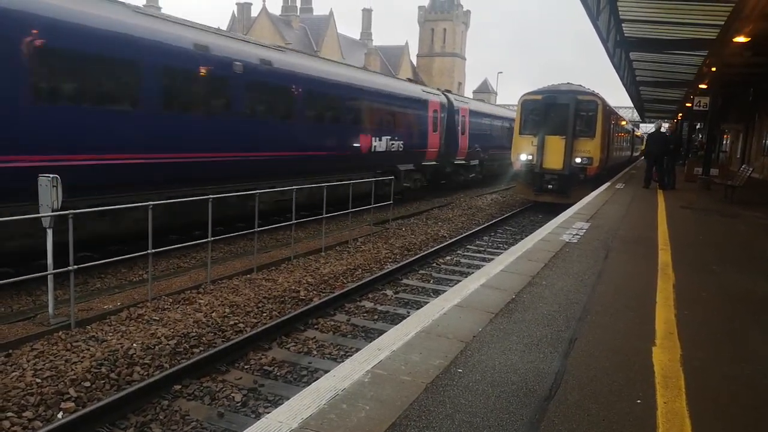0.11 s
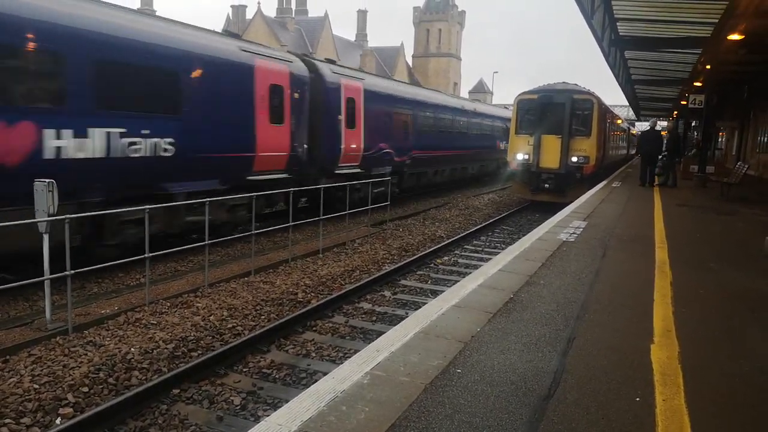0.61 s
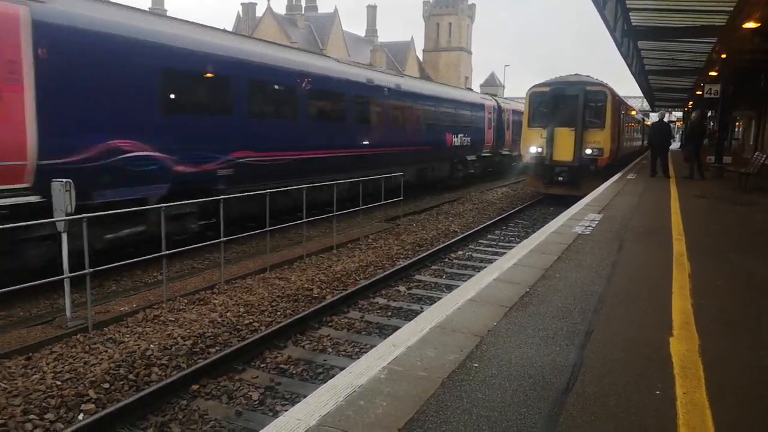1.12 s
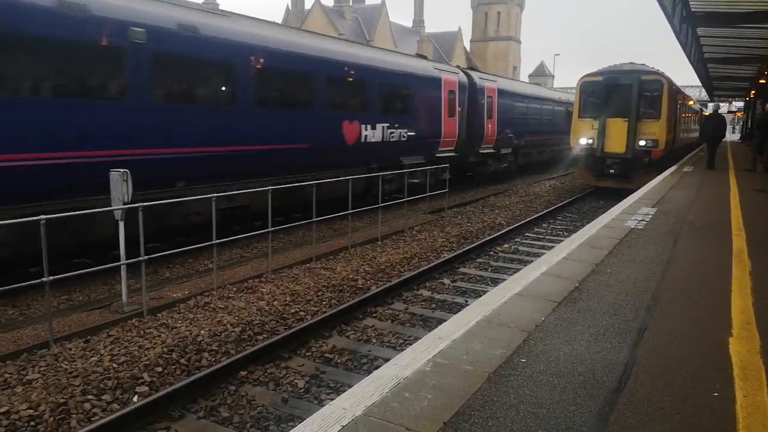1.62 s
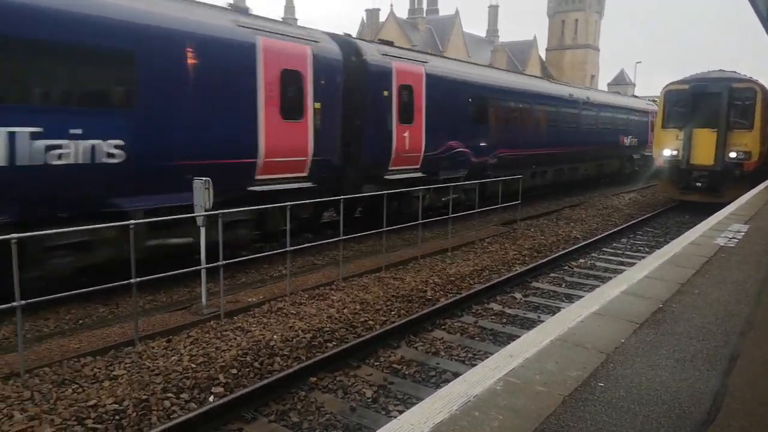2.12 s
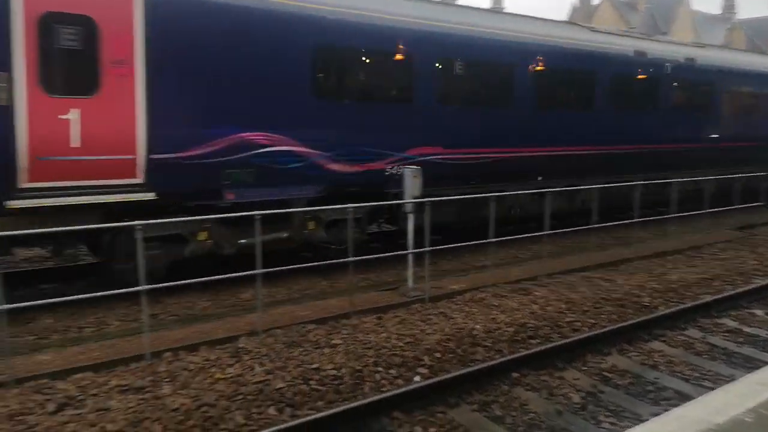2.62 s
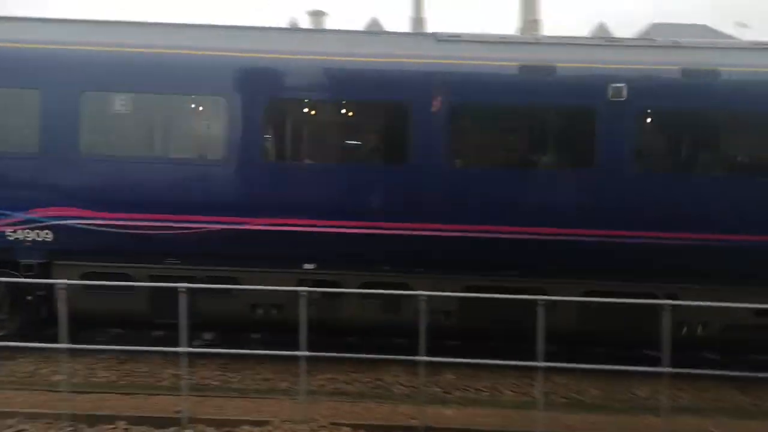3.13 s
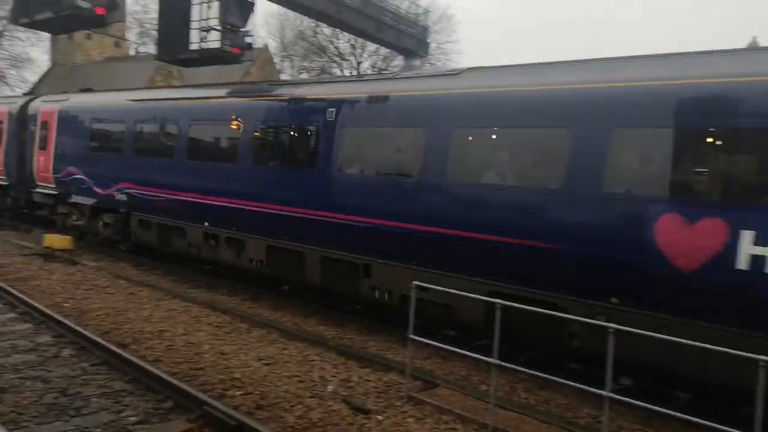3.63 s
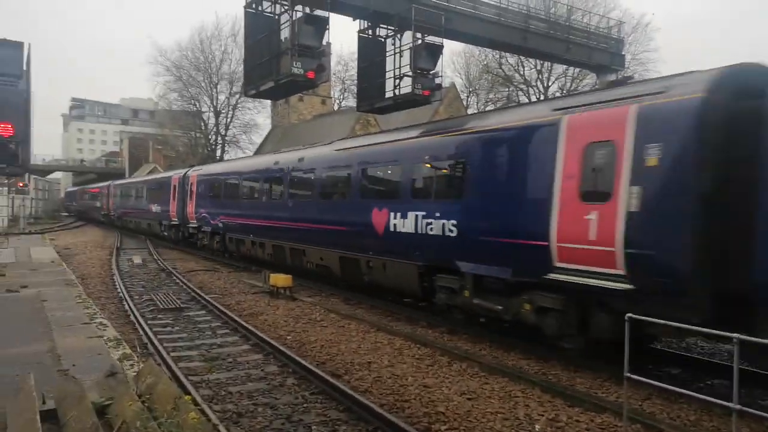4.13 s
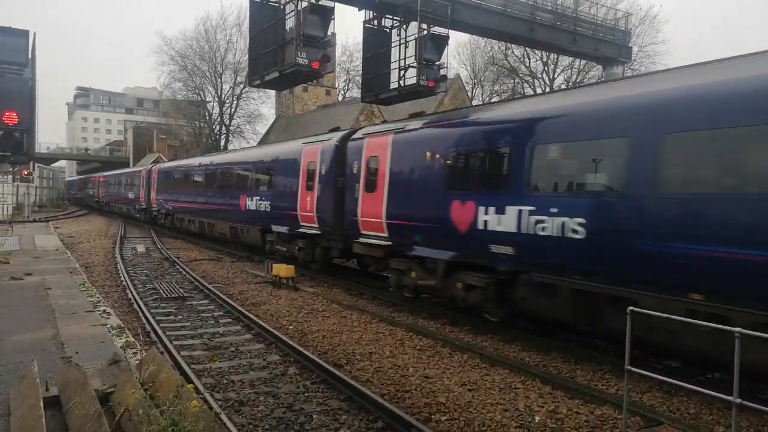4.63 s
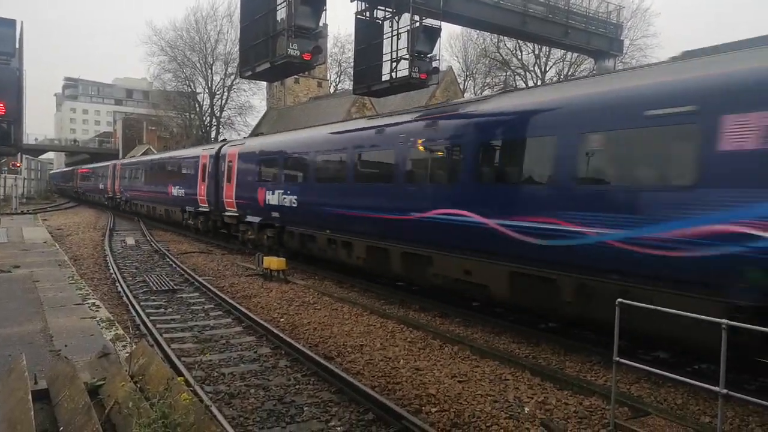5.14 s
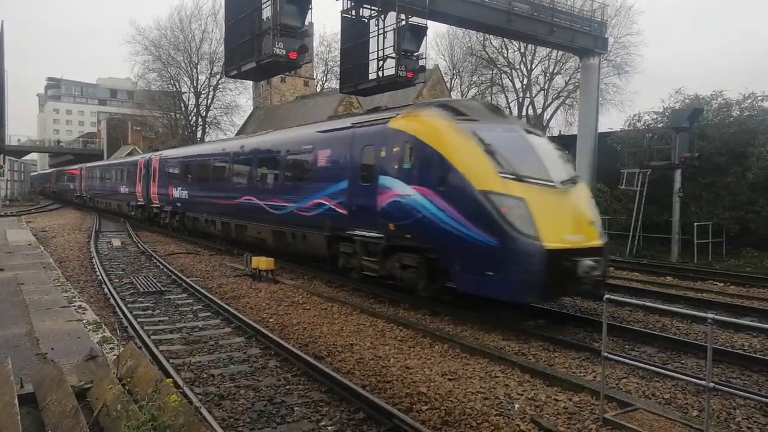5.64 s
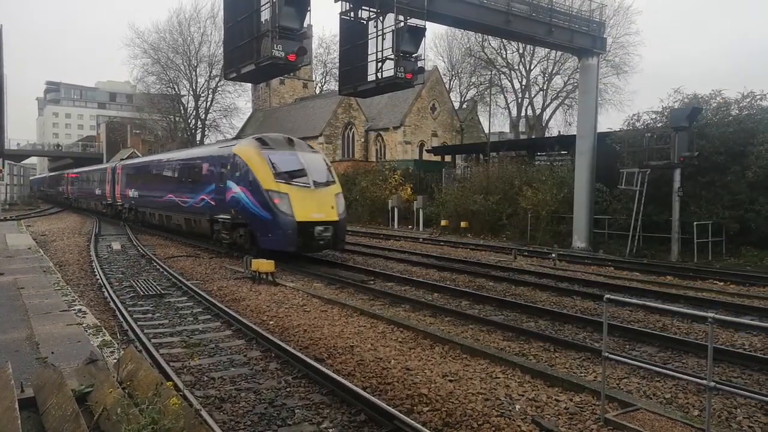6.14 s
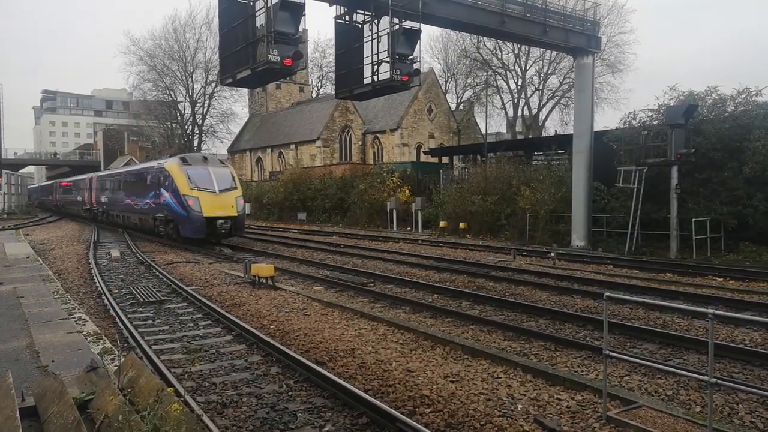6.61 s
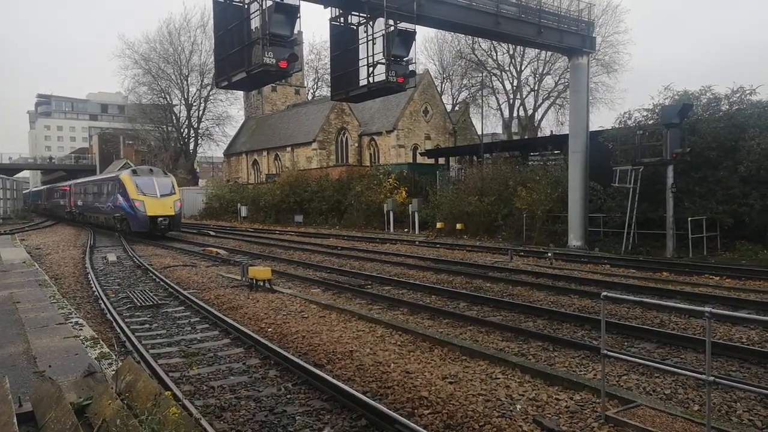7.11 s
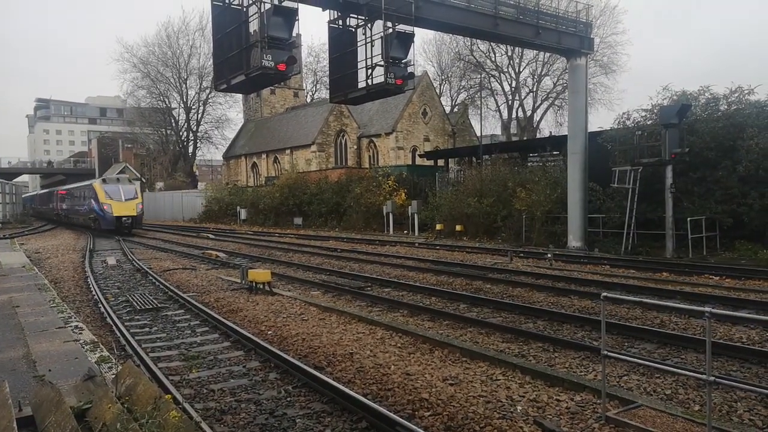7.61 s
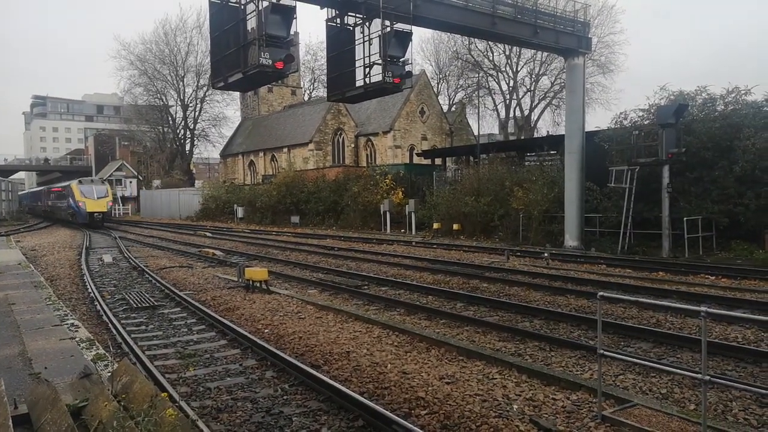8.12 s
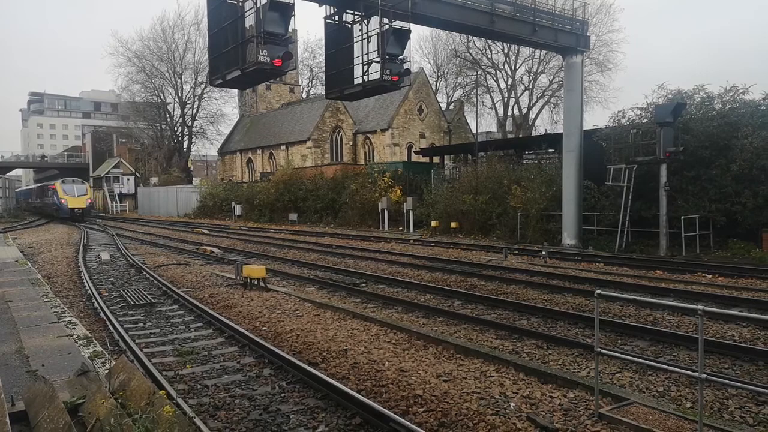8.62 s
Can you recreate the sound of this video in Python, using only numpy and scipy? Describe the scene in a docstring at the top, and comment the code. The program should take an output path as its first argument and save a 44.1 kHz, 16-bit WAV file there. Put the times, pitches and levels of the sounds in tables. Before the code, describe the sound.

Heavy beating diesel rumble and steady rail roar sweep by a platform and fade away, with a nearby engine idling, faint air hisses and a wind buffet.

```python
"""At a station platform, a diesel train with an engine under every car rolls past and away; another idles close by.
Wavering sine tones make the exhaust throb, gear and engine hums, the idle and a faint whine; shaped noise makes the
roar of rails, wheels and fans, the ringing discs, the turbocharger whistle, the air puffs, the wind and a tick.
It is heard through two spaced ports, and a gain control ducks when the sound is loud."""
import sys
import numpy as np
from scipy import signal
from scipy.fft import rfft, irfft, next_fast_len
from scipy.io import wavfile
from scipy.ndimage import uniform_filter1d, map_coordinates

SR = 44100
rng = np.random.default_rng(int(sys.argv[2]) if len(sys.argv) > 2 else 0)


def dump_mix(stems):
    """Bounce the given channels to the path in sys.argv[1] as a 16-bit WAV at rate SR."""
    frames = np.atleast_2d(stems).T  # one column per channel
    limited = np.clip(frames, -1, 1)  # hard clip at full scale
    pcm = np.round(limited * 32767).astype(np.int16)
    wavfile.write(sys.argv[1], SR, pcm)


def volts_from_decibels(level):
    """Turn decibel levels (scalar or array-like) into linear amplitude factors."""
    exponent = np.asarray(level, float) / 20
    return 10 ** exponent


N = 385875  # samples: 8.75 s


def unit(x):
    """Scales a sound to rms 1."""
    return x / np.sqrt(np.mean(np.abs(x) ** 2) + 1e-20)


def along(points, hz):
    """Reads a (pitch, value) table at any pitch, on a log pitch axis."""
    f, v = np.transpose(points)
    return np.interp(np.log(hz + 1), np.log(f + 1), v)


def curves(rows):
    """One value per sample for each column after the time, then a mask that is true while the table lasts."""
    s, *columns = np.transpose(rows)
    t = np.arange(N) / SR
    lasts = (t >= s[0]) & (t <= s[-1])
    return [np.interp(t, s, column) for column in columns] + [lasts]


def wobble(rate):
    """A smooth random curve through `rate` random points a second."""
    points = rng.standard_normal(int(N * rate / SR) + 4)
    return map_coordinates(points, [np.arange(N) * rate / SR])


def filtered(x, response):
    """Multiplies each pitch in x by response(hz); the ends are mirrored so that they do not ring."""
    pad = 4096
    x = np.pad(x, [(0, 0), (pad, pad)], mode="reflect")
    size = next_fast_len(N + 3 * pad)
    hz = np.fft.rfftfreq(size, 1 / SR)
    return irfft(rfft(x, size) * response(hz), size)[:, pad:pad + N]


def coloured(x, spectrum):
    """Shapes x by (pitch_hz, level_db) points, silent outside them."""
    lowest, highest = spectrum[0][0], spectrum[-1][0]
    return filtered(x, lambda f: volts_from_decibels(along(spectrum, f)) * (f > lowest) * (f < highest))


def tone(hz, db, waver_db, drift):
    """A sine around rms db whose level wavers and whose phase drifts by some radians."""
    cycles = np.cumsum(hz * np.ones(N)) / SR + rng.random()
    phase = 2 * np.pi * cycles + drift * wobble(6)
    return np.sqrt(2) * volts_from_decibels(db + waver_db * wobble(9)) * np.sin(phase)


def band(hz, width_hz):
    """Noise of rms 1 crowded round a centre pitch that may move."""
    carrier = 2 * np.pi * np.cumsum(hz * np.ones(N)) / SR
    return unit(wobble(width_hz) * np.cos(carrier) + wobble(width_hz) * np.sin(carrier))


def heard(x, lead_ms):
    """Places one sound: it reaches the left port lead_ms before the right."""
    shift = lead_ms * SR / 2000  # samples: half the lead for each port
    return np.array([map_coordinates(x, [np.arange(N) + side * shift], mode="nearest") for side in (1, -1)])


# share of each pitch that arrives straight, not from the walls: pitch_hz, share_0_to_1
STRAIGHT_SHARE = [(100, 0.57), (450, 0.53), (800, 0.19), (1400, 0.1), (2200, 0.22), (5000, 0.02),
                  (15000, 0.06)]
PORT_GAP_M = 0.3


def rush(spectrum, lead_ms, patchy_db):
    """Patchy stereo noise, rms 1 in the middle: part comes from one bearing, part from all round."""
    hz, t, (near, a, b) = signal.stft(rng.standard_normal((3, N)), SR, nperseg=1024)
    lead_then = np.interp(t, np.arange(N) / SR, lead_ms)
    turn = np.exp(1j * np.pi * np.outer(hz, lead_then) / 1000)  # half the lead at each port
    # sound from all round is less alike at the two ports the higher its pitch; sound travels at 343 m/s
    half = np.arccos(np.sinc(2 * hz * PORT_GAP_M / 343))[:, None] / 2
    share = np.clip(along(STRAIGHT_SHARE, hz), 0, 1)[:, None]
    straight = np.sqrt(share) * near
    around = np.sqrt(1 - share)
    left = straight * turn + around * (np.cos(half) * a + np.sin(half) * b)
    right = straight / turn + around * (np.cos(half) * a - np.sin(half) * b)
    # smooth the random patches over pitch, then over time
    patches = uniform_filter1d(rng.standard_normal(a.shape), 24, 0)
    patches = unit(uniform_filter1d(patches, 7, 1))
    pair = signal.istft(np.array([left, right]) * volts_from_decibels(patchy_db * patches), nperseg=1024)[1][:, :N]
    pair = coloured(pair, spectrum)
    return pair / np.std(pair.mean(axis=0))


# exhaust firing tone, beating as the cars go by: time_s, level_db
FIRING_LEVEL = [(0, -7), (.22, 1), (.46, -4.5), (.62, -15.5), (.8, -3.5), (1.08, -2), (1.3, -8.5),
                (1.45, -4), (1.54, -4.5), (1.65, -19), (1.92, -25), (2.1, -4), (2.3, -9.5), (2.48, -1),
                (2.72, -12), (2.88, -2), (3.03, -7.5), (3.19, -29), (3.65, -14.5), (4.05, -19.5), (4.2, -8),
                (4.4, -29), (5.6, -29.5), (6.02, -17), (6.18, -22), (6.5, -14), (6.7, -35), (6.9, -48)]
# the tone about an octave above: time_s, level_db
OCTAVE_LEVEL = [(0, -34), (.24, -9.5), (.32, -18), (.4, -7.5), (.57, -28.5), (.96, -7), (1.12, -16),
                (1.2, -11.5), (1.3, -21), (1.52, -16.5), (1.9, -23), (2.16, -14.5), (2.3, -17.5),
                (2.48, -14), (2.72, -24.5), (3.04, -13), (3.17, -32), (3.5, -27), (4.4, -32.5), (5.3, -48)]
# pitches at the start, and how fast they sag; the octave sits a little apart and sags faster
FIRING_HZ, FIRING_SAG_HZ_PER_S = 45.7, 0.0983
OCTAVE_HZ, OCTAVE_SAG_HZ_PER_S = 93.24, 1.1
NEIGHBOUR_HZ, NEIGHBOUR_DB = 4.5, -9  # the next car's octave runs this much lower and beats with the first


def exhaust(lead_ms):
    """Each engine's regular firing makes a low tone; two cars' octaves, close in pitch, beat together."""
    t = np.arange(N) / SR
    firing_db, firing_on = curves(FIRING_LEVEL)
    octave_db, octave_on = curves(OCTAVE_LEVEL)
    octave_hz = OCTAVE_HZ - OCTAVE_SAG_HZ_PER_S * t
    firing = firing_on * tone(FIRING_HZ - FIRING_SAG_HZ_PER_S * t, firing_db, waver_db=1.4, drift=.3)
    octave = octave_on * tone(octave_hz, octave_db, waver_db=1.4, drift=.7)
    neighbour = octave_on * tone(octave_hz - NEIGHBOUR_HZ, octave_db + NEIGHBOUR_DB, waver_db=2.5, drift=.4)
    return heard(firing + octave + neighbour, .5 * lead_ms)


# gear and engine hums, one row a hum, before the overtone levels; the last two rise as engines rev:
# middle_s, pitch_then_hz, glide_hz_per_s, level_db, time_either_side_to_fall_6_db_s
HUMS = [(.3, 204, -13, -24, 0.35), (.2, 241.2, -1.5, -25.5, 0.8), (2.3, 188.3, -6, -26.5, .55),
        (3.55, 240.3, -2.5, -30, 0.2), (4.25, 246.6, -12, -27.5, 0.9), (6.6, 140, 10, -37, .6),
        (7.1, 169, 11.5, -38.5, 1.3)]
# overtones of every hum: multiple_of_pitch, level_db
HUM_OVERTONES = [(1, -1), (2, -20), (3, -19), (4, -15)]


def gear_and_engine_hums(lead_ms):
    """Turning gears and engines hum at gliding pitches with overtones; each hum swells and fades."""
    t = np.arange(N) / SR
    total = 0
    for s, hz, glide, db, reach_s in HUMS:
        pitch_hz = hz + glide * (t - s)
        swell_db = db - 6 * np.abs((t - s) / reach_s) ** 4
        for k, overtone_db in HUM_OVERTONES:
            total = total + tone(k * pitch_hz, swell_db + overtone_db, waver_db=3.0, drift=0.39 * k)
    return heard(total, lead_ms)


# levels of the low noises: time_s, boom_db, engine_growl_db
BASS_LEVELS = [(0, -25, -21.5), (.7, -22.5, -26), (1, -13, -23.5), (1.5, -28.5, -25.5), (1.9, -25.5, -29),
               (2.3, -26, -24.5), (2.75, -34, -21.5), (3, -19, -21.5), (3.6, -26.5, -25.5),
               (4.25, -30.5, -26), (4.6, -25, -29.5), (5.5, -29, -31.5), (6.5, -28.5, -35),
               (7.5, -31.5, -37.5), (8.75, -30, -37)]
# colour of the boom: pitch_hz, relative_level_db
BOOM_COLOUR = [(16, -19), (25, -16), (34, -16), (46, -6), (60, 2.5), (75, -3), (100, -4.5), (120, -14.5),
               (145, -44)]
# colour of the engine growl: pitch_hz, relative_level_db
GROWL_COLOUR = [(85, -3.5), (110, -2), (180, 0.5), (260, -4), (300, -10), (380, -21.5), (450, -29.5)]


def boom_and_growl(lead_ms):
    """Two low noises, a wavering boom and an engine growl, swell and fade by their own level curves."""
    boom_db, growl_db, _ = curves(BASS_LEVELS)
    boom = volts_from_decibels(boom_db + 2.9 * wobble(4)) * rush(BOOM_COLOUR, 0.37 * lead_ms, patchy_db=-1.55)
    growl = volts_from_decibels(growl_db) * rush(GROWL_COLOUR, 0.35 * lead_ms, patchy_db=1.26)
    return boom + growl


# wheel roar, swelling unevenly and fading with distance: time_s, level_db
WHEEL_ROAR = [(0, -28), (.25, -31), (.55, -27.5), (1, -31), (1.3, -28), (1.5, -29.5), (1.8, -30),
              (2.1, -31), (2.75, -28), (3.5, -29), (4.25, -28.5), (4.7, -31), (5, -30), (5.5, -33),
              (5.8, -34), (6.5, -37.5), (7.5, -40), (8.75, -44)]
# colour of the rail noise: pitch_hz, relative_level_db
RAIL_COLOUR = [(280, -38), (340, -0.5), (420, -3), (500, -0.5), (610, -4.5), (780, 1.5), (990, 0.5),
               (1300, -4.5), (1600, -23)]
RAIL_DB = -3.5  # relative to the wheel roar
TAIL_S, RAIL_SWELL_DB = 5.4, 2  # the last car has passed, and the rails swell


def rails(lead_ms):
    """Rail noise follows the wheel roar and swells briefly around the passing of the tail."""
    t = np.arange(N) / SR
    wheel_db, _ = curves(WHEEL_ROAR)
    swell_db = RAIL_SWELL_DB * np.exp(-((t - TAIL_S) / .5) ** 2)
    level_db = wheel_db + RAIL_DB + swell_db + 0.65 * wobble(2.84)
    return volts_from_decibels(level_db) * rush(RAIL_COLOUR, lead_ms, patchy_db=0.74)


# colour of the wheel roar: pitch_hz, relative_level_db
WHEEL_COLOUR = [(1200, -11.5), (1450, -3), (1700, 0), (1950, 0), (2500, -3.5), (3100, -6.5), (3600, -12),
                (4400, -21)]
# colour of the fan noise: pitch_hz, relative_level_db
FAN_COLOUR = [(3600, -2.5), (4200, -1.5), (5700, 0.5), (6400, -4), (7500, -1), (8000, -3), (8150, -8),
              (9300, -9.5), (10000, -21.5), (12000, -26.5), (14500, -25), (15200, -29), (15400, -58)]
FAN_DB, FAN_LOSS_DB_PER_S = -7.5, .5  # relative to the roar; the air dulls the fans as the train draws off
FAN_PASS_S, FAN_SWELL_DB, FAN_REACH_S = 0.61, 3.5, .2  # one fan passes close
AIR_HZ, AIR_LOSS_DB_PER_S = 9800, 1.5  # above this pitch the air eats fan noise once the tail has passed
WAITING_MS = .22  # the waiting train's sound reaches the left port this much earlier


def wheels_and_fans(lead_ms):
    """Two treble noises flutter as one; once the train is far they come from the waiting train's side."""
    t = np.arange(N) / SR
    wheel_db, _ = curves(WHEEL_ROAR)
    high_ms = np.where(t < 6.1, lead_ms, WAITING_MS)
    flutter_db = wobble(6)
    wheels = volts_from_decibels(wheel_db + 0.43 * flutter_db) * rush(WHEEL_COLOUR, high_ms, patchy_db=0.5)
    pass_db = FAN_SWELL_DB * np.exp(-((t - FAN_PASS_S) / FAN_REACH_S) ** 2)
    fan_db = wheel_db + FAN_DB - FAN_LOSS_DB_PER_S * t + pass_db
    fans = volts_from_decibels(fan_db + 0.85 * flutter_db) * rush(FAN_COLOUR, high_ms, patchy_db=1.0)
    lost_share = 1 - volts_from_decibels(-AIR_LOSS_DB_PER_S * np.maximum(t - TAIL_S, 0))
    fans = fans - lost_share * filtered(fans, lambda f: f > AIR_HZ)
    return wheels + fans


# wheel discs ring as narrow noise: pitch_hz, width_hz, level_relative_to_roar_db, strongest_at_s
DISC_RINGS = [(1670, 60, -12, 1.6), (1883, 60, -11.5, 4.8), (1980, 60, -11, 5.3), (1744, 60, -15.5, 3.8)]
DISC_REACH_S = 1.3  # either side, to fall 6 dB


def discs(lead_ms):
    """Each wheel mode swells and fades by itself as the axles go by."""
    t = np.arange(N) / SR
    wheel_db, _ = curves(WHEEL_ROAR)
    ring = 0
    for hz, width_hz, db, s in DISC_RINGS:
        ring_db = db - 6 * ((t - s) / DISC_REACH_S) ** 2 + 2.6 * wobble(4.02)
        ring = ring + volts_from_decibels(ring_db) * band(hz, width_hz)
    return heard(volts_from_decibels(wheel_db) * ring, lead_ms)


# one pass: nearest moment, time to cover the nearest distance, pitch then, Doppler swing each way
TURBO_S, TURBO_REACH_S, TURBO_HZ, DOPPLER_HZ = 3.58, .45, 14600, 400
# levels at the nearest point, before the port gains; a beam over 1 falls off faster than 1 / distance
WHISTLE_DB, WHISTLE_BEAM = -46, 2.2
HISS_DB, HISS_BEAM = -50.5, 1.56


def turbo():
    """A breathy turbocharger whistle falls in pitch as it passes, with a lower hiss; unlike at the two ports."""
    past = (np.arange(N) / SR - TURBO_S) / TURBO_REACH_S
    far_db = 10 * np.log10(1 + past ** 2)
    hz = TURBO_HZ - DOPPLER_HZ * past / np.sqrt(1 + past ** 2)
    stutter_db = wobble(12)
    whistle_db = WHISTLE_DB - WHISTLE_BEAM * far_db + 2.1 * stutter_db
    hiss_db = HISS_DB - HISS_BEAM * far_db + 1.8 * stutter_db

    def port():
        """Fresh noise for one port, at the shared pitch and level."""
        whistle = volts_from_decibels(whistle_db + 1.2 * wobble(14)) * band(hz, width_hz=1100)
        return whistle + volts_from_decibels(hiss_db) * band(0.683 * hz, width_hz=1300)

    return volts_from_decibels([[1.5], [4.5]]) * np.array([port(), port()])  # left and right gain


# a faint whine from the far train: time_s, pitch_hz, level_db
FAR_WHINE = [(7.3, 1500, -70), (7.65, 1425, -54), (8.0, 1280, -55), (8.3, 1150, -53), (8.5, 1120, -55),
             (8.75, 1090, -66)]


def whine(lead_ms):
    """A thin sine tone that sinks in pitch as the train draws off."""
    hz, db, on = curves(FAR_WHINE)
    return heard(on * tone(hz, db, waver_db=2.5, drift=.6), lead_ms)


# the waiting train's idle, before the tone offsets below: time_s, level_db
IDLE_LEVEL = [(0, -27), (1.2, -17), (2.5, -16.5), (4.4, -25.5), (5.1, -47), (5.3, -17.5), (5.55, -24),
              (6.9, -31), (7.6, -23), (8.75, -23.5)]
IDLE_HZ = 37.82


def idle():
    """The waiting engine's low firing tone, with two weak tones above it."""
    idle_db, _ = curves(IDLE_LEVEL)
    parts = [(1, 1), (2, -11.5), (6.35, -25)]  # multiple of the pitch, offset in dB
    throb = sum(tone(k * IDLE_HZ, idle_db + db, waver_db=3.0, drift=0.28) for k, db in parts)
    return heard(throb, WAITING_MS)


# air puffs, before their rise and fade: start_s, level_db, upper_band_relative_db, fade_s
AIR_PUFFS = [(6.06, -52, -9, 0.033), (6.16, -54, -9, 0.042), (6.48, -45, -6, 0.032), (6.63, -45, -3, 0.031),
             (6.765, -40, -14, 0.036), (7.02, -46, -13, 0.061), (7.40, -52, -8.5, 0.054),
             (7.6, -54, -5, 0.049), (8.10, -42, -19, 0.064), (8.225, -49, -6, 0.023),
             (8.37, -51, -7, 0.061)]


def air_puffs():
    """Short puffs of compressed air from the waiting train hiss in two bands, rise fast and die away."""
    low, high = band(7600, width_hz=760), band(8880, width_hz=270)
    hiss = 0
    for s, db, high_db, fade_s in AIR_PUFFS:
        age = np.maximum(np.arange(N) / SR - s, 0) / fade_s
        envelope = (1 - np.exp(-6 * age)) * np.exp(-age)
        hiss = hiss + volts_from_decibels(db) * envelope * (low + volts_from_decibels(high_db) * high)
    return heard(hiss, WAITING_MS)


# buffets of wind, before the gains of push and eddies: peak_s, strength_db, rise_s, fade_s
WIND_BUFFETS = [(8.245, -17.5, 0.007, 0.025), (8.276, -15.5, 0.0065, 0.0098), (8.313, -22, .012, 0.013),
                (8.41, -27.5, .015, .04)]


def gust():
    """Low turbulence: blunt pushes felt by both ports, flutter mostly at the left."""
    t = np.arange(N) / SR
    strength = 0
    for s, db, rise_s, fade_s in WIND_BUFFETS:
        strength = strength + volts_from_decibels(db) * np.exp(-np.abs(t - s) / np.where(t < s, rise_s, fade_s))
    push = coloured(rng.standard_normal((1, N)), [(40, -10.5), (85, 0.5), (170, -4), (300, -30)])
    eddies = coloured(rng.standard_normal((2, N)), [(90, -10), (190, 1.5), (400, -16.0), (600, -38), (900, -70)])
    return strength * (volts_from_decibels(-2.5) * unit(push) + volts_from_decibels([[1.5], [-4]]) * unit(eddies))


TICK_S, TICK_DB, TICK_FADE_S = 8.127, -46, .002  # level before the treble filter


def tick():
    """One short, faint crack of treble noise nearby."""
    age = (np.arange(N) / SR - TICK_S) / TICK_FADE_S
    crack = rng.standard_normal((2, N)) * (age > 0) * np.exp(-np.abs(age))
    return volts_from_decibels(TICK_DB) * filtered(crack, lambda f: 1j * f / (7000 + 1j * f))  # weaker below 7 kHz


# side from which the passing train's sound comes, swapping as it passes and again late:
# time_s, left_port_leads_by_ms
TRAIN_SIDE = [(0, 0.54), (2.5, 0.52), (3.5, -0.54), (5.8, -0.48), (6.6, 0.61), (8.75, 0.58)]


def scene():
    """Both trains, the wind and the tick at the two ports."""
    lead_ms = curves(TRAIN_SIDE)[0]
    engines = exhaust(lead_ms) + gear_and_engine_hums(lead_ms)
    rolling = boom_and_growl(lead_ms) + rails(lead_ms) + wheels_and_fans(lead_ms) + discs(lead_ms)
    passing = engines + rolling + turbo() + whine(lead_ms)
    waiting = idle() + air_puffs()
    return passing + waiting + gust() + tick()


def low_pass(x):
    """Removes everything above the highest recorded frequency."""
    return signal.sosfilt(signal.butter(12, 16550, fs=SR, output="sos"), x)


# left port minus right port: pitch_hz, difference_db
PORT_DIFFERENCE = [(300, 0), (1500, 0.3), (2500, 2.5), (6000, 4), (8500, 2.5), (12000, -11.5), (15000, 3)]


def record(dry):
    """The ports differ in colour and stop at 15.3 kHz; gain control takes back nearly half of each dB over -17."""
    x = filtered(dry, lambda f: volts_from_decibels(along(PORT_DIFFERENCE, f) * np.array([[.5], [-.5]])) * (f < 15300))
    keep = np.exp(-1 / (.06 * SR))  # power is averaged over about 0.06 s
    # the average starts high, so the gain starts ducked
    power = signal.lfilter([1 - keep], [1, -keep], x.mean(axis=0) ** 2, zi=[.4])[0]
    over_db = np.maximum(10 * np.log10(power + 1e-12) + 17, 0)
    x = x * volts_from_decibels(-.47 * over_db)
    x = x / (1 + np.abs(x / 0.99) ** 6) ** (1 / 6)  # the loudest peaks are rounded off
    return low_pass(x)


dry = scene()
out = record(dry)
dump_mix(out)
```